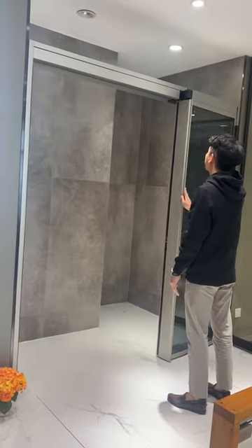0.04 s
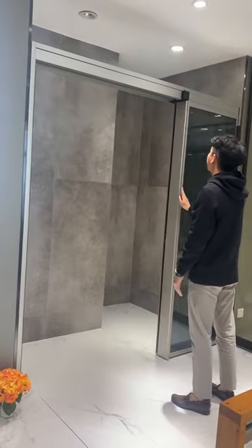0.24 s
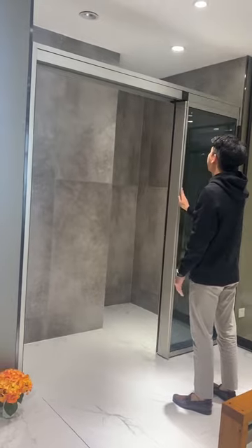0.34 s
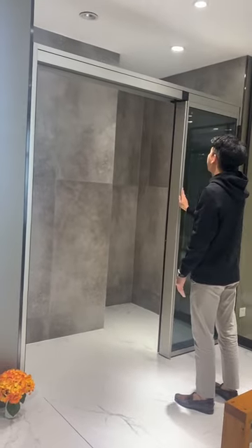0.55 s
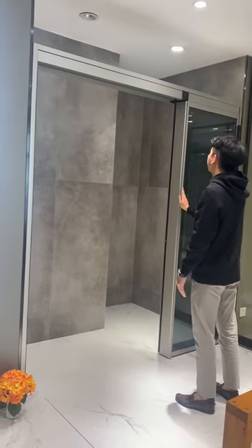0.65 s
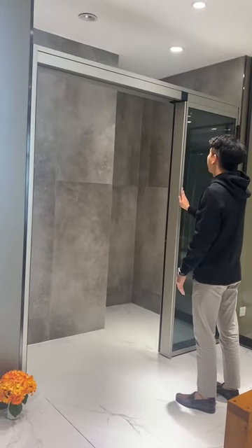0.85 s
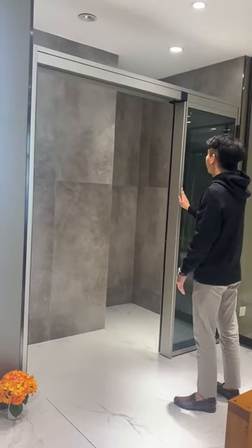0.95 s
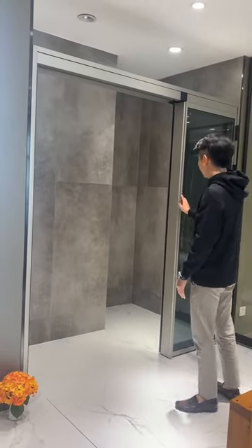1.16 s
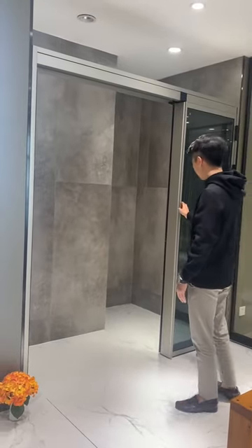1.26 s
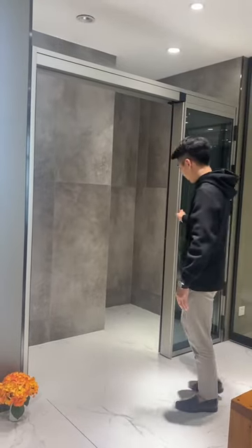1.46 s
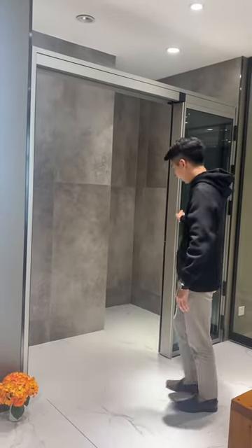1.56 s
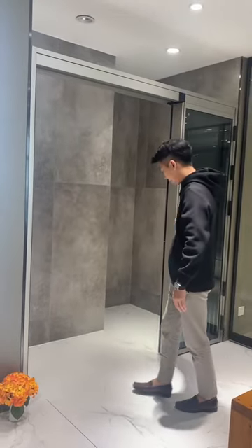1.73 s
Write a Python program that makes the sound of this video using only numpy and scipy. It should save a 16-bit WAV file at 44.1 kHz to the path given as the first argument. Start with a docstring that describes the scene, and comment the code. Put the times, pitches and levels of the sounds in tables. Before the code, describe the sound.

A sliding glass door knocks twice against its metal frame, a catch snaps, and the heavy pane booms and shudders. Shoes and clothes then brush softly over a low ventilation hum, a few metres away in a tiled room.

```python
"""A glass door knocks shut

A glass panel is pushed home and knocks twice on its metal frame, a few metres away in a tiled room.
Each knock is a cluster of contacts that ring the frame and click the fittings. A catch snaps, and
the heavy pane booms and shudders on. Shoes and clothes brush softly as a person turns away,
over a low drone, probably ventilation."""
import sys
import numpy as np
from scipy import signal
from scipy.fft import rfft, irfft
from scipy.io import wavfile
from scipy.ndimage import uniform_filter1d

SR = 44100
rng = np.random.default_rng(int(sys.argv[2]) if len(sys.argv) > 2 else 0)


def bounce(signal):
    """Save signal as a 16-bit WAV file at the path given by the first command-line argument."""
    frames = np.transpose(np.atleast_2d(signal))
    limited = np.clip(frames, -1, 1)
    pcm = np.round(limited * 32767).astype(np.int16)
    wavfile.write(sys.argv[1], SR, pcm)


N = 79380

# The panel meets the frame. Each row: start in seconds, then knock, click, clack and extra bass in dB.
CONTACTS = [(0.22, -1.5, -9, -1, -4.5), (0.226, -4.5, 3, -9, -2.5), (0.241, 2.5, 0, -7, -1.5),
            (0.275, -3, -20.5, -17.5, 2), (0.311, -8.5, -19.5, -10, 0), (0.320, 2.5, -3, -1, 1),
            (0.333, -2, 2, -18, 3), (0.343, -1.5, 0.5, -14.5, 3)]
# How the panel's edge loses treble. Each row: frequency in Hz, gain in dB.
EDGE_SOFTNESS = [(3500, -0.5), (7000, -20.5)]
DOOR_DIRECT_DB = -18.5  # sound straight from the door, compared with its echo


def knocks():
    """Each contact cracks, clicks the fittings and rings the frame; heavier ones bring out more bass."""
    # The tone of a knock and of a click. Each row: frequency in Hz, gain in dB.
    knock_tone = [(100, -5.5), (250, -1), (550, -5), (850, -2.5), (1300, -5), (1750, -12.5), (2650, -17),
                  (3100, -16), (4400, -19), (7000, -32), (13000, -45.5)]
    click_tone = [(1500, -24.5), (3200, -27.5), (4500, 1.5), (4850, -18.5), (5400, -0.5), (7500, -2.5),
                  (9500, -13.5), (12500, -17.5)]
    # The frame's notes. Each row: pitch in Hz, level in dB, seconds to fade by 60 dB.
    frame_notes = [(328, -3, 1), (380.4, -6.5, 0.8), (482.5, -8, 0.91), (648, -6.5, 0.74),
                   (769.3, 4.5, 0.47), (800.6, 1, 0.43), (838, 0.5, 0.38), (891, 0, 0.35),
                   (947, -1.5, 0.18), (983, 2.5, 0.36), (1226, -5.5, 0.58), (1353, -4, 0.19),
                   (2482, -11.5, 0.55)]
    t, body, clicks, rings = clock(), 0, 0, 0
    for start, knock_db, click_db, _, bass_db in CONTACTS:
        bass_gain = [(706, bass_db), (1290, 0)]  # full effect below 706 Hz, none above 1290 Hz
        crack = rng.standard_normal(N) * np.exp(-t / .003)
        crack = undb(-18.5) * crack / np.sqrt(np.sum(crack ** 2))
        hit = delay(room(DOOR_DIRECT_DB) + crack, start)
        body += undb(knock_db) * colour(hit, bass_gain)
        clicks += undb(click_db) * hit
        notes = [(hz, db + lookup(bass_gain, hz), fade_s) for hz, db, fade_s in frame_notes]
        ringing = ring(notes, wander_hz=7.98) * rise(0.0019)
        rings += undb(knock_db) * delay(ringing, start)
    return undb(6) * colour(body, knock_tone) + undb(-6.5) * colour(clicks, click_tone) + undb(-46) * rings


def pane():
    """Soft pushes set the heavy pane swinging, and the room booms with it."""
    # The pane swings against its stops. Each row: start in seconds, level in dB, push time in seconds.
    thumps = [(0.002, -26, 0.00077), (0.23, -13, 0.012), (0.272, -14, 0.0054), (0.349, 1.5, 0.011),
              (0.45, -13, 0.004), (0.525, -13, 0.0024), (0.592, -10, 0.0043), (0.795, -27.5, 0.0074),
              (1.014, -20, 0.016), (1.069, -23, 0.0066)]
    # The pane's notes. Each row: pitch in Hz, level in dB, seconds to fade by 60 dB.
    pane_notes = [(59.3, -12.5, 1), (68.3, -14, 1.0), (100.3, 4.5, 0.16), (139.26, 2.5, 0.37),
                  (163.6, 0, .42), (208.75, -1.5, 0.42), (312, -13, 0.3)]
    # The tone of the boom. Each row: frequency in Hz, gain in dB.
    boom_tone = [(20, -47.5), (40, -14.5), (60, 7), (100, 2.5), (150, 12.5), (220, 2), (320, -1.5),
                 (500, -8), (1000, -51.5)]
    ringing, boom = 0, 0
    for start, db, push_s in thumps:
        swell = undb(db) * rise(push_s)
        ringing += delay(swell * ring(pane_notes, wander_hz=1.6), start)
        boom += delay(swell * room(DOOR_DIRECT_DB), start)
    return undb(-27.5) * ringing + undb(13.5) * colour(boom, boom_tone)


def clacks():
    """The metal edge chatters for a few milliseconds at each contact."""
    # Where the edge rings. Each row: pitch in Hz, width in Hz, level in dB.
    edge_peaks = [(818, 113, 2.5), (958, 120, 2), (1357, 157, 0), (2020, 220, -5.5), (2360, 240, -1.5),
                  (2714, 103, -4.5), (3450, 180, -21)]
    shape = undb(-27) * pulse(rise_s=0.0018, fall_s=0.009)
    out = sum(delay(undb(db) * shape * resonant(edge_peaks), start) for start, _, _, db, _ in CONTACTS)
    out = colour(out, EDGE_SOFTNESS)
    return out + undb(-1) * convolve(out, room(DOOR_DIRECT_DB))


def catch():
    """The metal catch pings as it is forced aside, then snaps home."""
    # Its moves. Each row: start in seconds, level in dB, pitch in Hz, width in Hz, fall in seconds.
    moves = [(0.311, -29.5, 2760, 161, 0.0069), (0.316, -37.5, 3600, 450, 0.0043),
             (0.333, -40, 8500, 3200, 0.011)]
    out = 0
    for start, db, hz, width, fall_s in moves:
        band = [(hz - 1.8 * width, -40), (hz - width / 2, -3), (hz, 0),
                (hz + width / 2, -3), (hz + 3 * width, -40)]
        out += delay(undb(db) * pulse(0.0023, fall_s) * noise(band), start)
    return out + undb(-9) * convolve(out, room(DOOR_DIRECT_DB))


def tap():
    """The loose panel squeaks faintly in its guide and taps it once as it is pushed."""
    # Where the tap rings. Each row: pitch in Hz, width in Hz, level in dB.
    tap_peaks = [(274, 31, 2.5), (1100, 110, -2.5), (1700, 350, -10), (3350, 400, -13), (5600, 1200, -23)]
    burst = pulse(rise_s=0.0051, fall_s=0.021) * colour(resonant(tap_peaks), EDGE_SOFTNESS)
    burst = delay(undb(-53) * burst, seconds=0.126)
    squeak_time = clock() - 0.11  # zero where the squeak is loudest
    squeak_hz = (3690 - 9200 * squeak_time) * (1 + 0.016 * wobble(370))
    squeak = undb(-80) * np.exp(-(squeak_time / .014) ** 2) * sine(squeak_hz)
    return convolve(burst + squeak, room(direct_db=-2.3))


def brushes():
    """The door seal, then shoes and clothes, slide: uneven rubbing noise that swells and dies away."""
    # The strokes. Each row: start, rise and fall in seconds, swish and dull rub in dB,
    # extra slope of the swish in dB per octave.
    strokes = [(0.199, 0.013, 0.0056, -50, -42, -3), (0.833, 0.054, 0.032, -49.5, -55, -5.5),
               (0.96, 0.034, 0.034, -70.5, -59.5, 13), (1.371, 0.065, 0.008, -61, -63, 3),
               (1.599, 0.13, 0.35, -63, -69, 3), (1.733, 0.0045, 0.012, -62, -62.5, 0)]
    # The tone of the swish and of the rub. Each row: frequency in Hz, gain in dB.
    swish_tone = [(1000, -25), (2800, -21.5), (3800, -4), (4800, -6), (6300, 1.5), (8000, -3.5),
                  (10000, -5.5), (12500, -14.5)]
    rub_tone = [(150, -26), (400, 7.5), (900, 4.5), (1500, 3), (2500, 2), (4500, -6.5), (9000, -45)]
    t, out = clock(), 0
    for start, rise_s, fall_s, swish_db, rub_db, slope in strokes:
        swell = np.clip((t - start) / rise_s, 0, 1) ** 0.72
        fade = np.exp(-np.maximum(t - start - rise_s, 0) / fall_s)
        swish = noise([(hz, db + slope * np.log2(hz)) for hz, db in swish_tone])
        flutter = undb(0.69 * wobble(99))
        out += swell * fade * flutter * (undb(swish_db) * swish + undb(rub_db) * noise(rub_tone))
    return undb(-4.5) * convolve(out, room(direct_db=-6))


def scrapes():
    """A turning sole sticks and slips on the tiles in short, grainy strokes."""
    # The slips. Each row: start in seconds, level in dB, fall in seconds.
    slips = [(1.566, -69.5, 0.05), (1.604, -72, .016), (1.622, -71, .018)]
    # Where the sole rings. Each row: pitch in Hz, width in Hz, level in dB.
    sole_peaks = [(890, 500, -5.5), (1860, 700, -4), (2650, 480, -0.5), (3390, 300, -2), (4100, 400, -2),
                  (5320, 350, -3)]
    out = 0
    for start, db, fall_s in slips:
        grain = undb(3 * wobble(400))
        out += delay(undb(db) * pulse(.006, fall_s) * grain * resonant(sole_peaks), start)
    return convolve(out, room(direct_db=-2))


def ventilation():
    """A fan's wavering hum, with a narrow drone around it, in a low rush of air."""
    # The tone of the moving air. Each row: frequency in Hz, gain in dB.
    air_tone = [(20, -21.5), (40, -4), (62, -1), (100, 0), (140, -5.5), (220, -10), (380, -15.5),
                (600, -27), (1200, -32), (2500, -44.5), (6000, -51.5), (13000, -62.5)]
    hum_hz, drone_hz, drone_width_hz = 87.5, 89, 17
    drone = shaped_noise(1 / (1 + ((frequencies() - drone_hz) / (drone_width_hz / 2)) ** 2))
    hum = sine(hum_hz * (1 + .03 * wobble(7.98))) * undb(3.5 * wobble(13))
    return undb(-59) * unit(hum) + undb(-55) * drone + undb(-57.5) * noise(air_tone)


def room(direct_db):
    """How the tiled room answers a click: direct sound, strong early echoes, a long tail that dulls."""
    # How long the echo lasts. Each row: frequency in Hz, seconds to fade by 60 dB.
    fade_times = [(60, 0.78), (200, 1.25), (500, 1.285), (1200, 1.176), (2500, 1.02), (5000, 0.85),
                  (8000, 0.59), (12000, 0.37)]
    t, tail = clock(), 0
    spectrum = rfft(rng.standard_normal(N))
    centres = 40 * 2 ** np.arange(0, 9.5, .5)  # bands half an octave apart, in Hz
    for hz, pick in zip(centres, np.eye(len(centres))):
        band = lookup(np.column_stack([centres, pick]), frequencies())
        tail += irfft(spectrum * band, N) * undb(-60 * t / lookup(fade_times, hz))
    tail *= 1 + undb(0.5) * np.exp(-t / 0.063)  # early echoes
    tail /= np.sqrt(np.sum(tail ** 2))
    tail[0] += undb(direct_db)
    return tail


def ring(notes, wander_hz):
    """The fading notes of a struck part; it sits loosely, so each one wanders in pitch."""
    t = clock()
    return sum(undb(db - 60 * t / fade_s) * sine(hz + wander_hz * wobble(40.2))
               for hz, db, fade_s in notes)


def resonant(peaks):
    """Noise that is strongest around the given pitches."""
    f = frequencies()[1:]
    power = sum(undb(db) ** 2 / (1 + ((f / hz - hz / f) * hz / width) ** 2) for hz, width, db in peaks)
    return shaped_noise(np.sqrt(np.append(0, power)))


def noise(tone):
    """Steady noise that follows a tone table."""
    return shaped_noise(undb(lookup(tone, frequencies())))


def shaped_noise(gains):
    """Noise with one gain for each frequency, scaled to strength 1."""
    return unit(irfft(rfft(rng.standard_normal(N)) * gains, N))


def colour(x, tone):
    """Filter a sound by a tone table, so that nothing rings before the sound starts."""
    cepstrum = irfft(np.log(undb(lookup(tone, frequencies()))), N)
    cepstrum[1:N // 2] *= 2
    cepstrum[N // 2 + 1:] = 0
    return convolve(x, irfft(np.exp(rfft(cepstrum)), N))


def wobble(rate):
    """A smooth random curve of strength 1 that changes about `rate` times a second."""
    hold = int(SR / rate)
    steps = np.repeat(rng.standard_normal(N // hold + 1), hold)
    return unit(uniform_filter1d(uniform_filter1d(steps, hold), hold)[:N])


def lookup(points, hz):
    """Read between a table's rows, with octaves evenly spaced."""
    f, values = np.array(points).T
    return np.interp(np.log(np.maximum(hz, 1)), np.log(f), values)


def rise(seconds):
    return 1 - np.exp(-clock() / seconds)


def pulse(rise_s, fall_s):
    return rise(rise_s) * np.exp(-clock() / fall_s)


def sine(hz):
    return np.sin(2 * np.pi * np.cumsum(hz) / SR)


def delay(x, seconds):
    return np.concatenate([np.zeros(int(seconds * SR)), x])[:N]


def convolve(a, b):
    return signal.fftconvolve(a, b)[:N]


def undb(db):
    return 10 ** (np.asarray(db) / 20)


def unit(x):
    return x / np.sqrt(np.mean(x ** 2))


def clock():
    return np.arange(N) / SR


def frequencies():
    return np.fft.rfftfreq(N, 1 / SR)


def scene():
    """The door, the person and the ventilation together in one channel."""
    return (tap() + knocks() + clacks() + catch() + pane() + brushes() + scrapes() + ventilation())[None]


def record(dry):
    """Cut the treble above 12500 Hz."""
    return signal.sosfilt(signal.ellip(8, .2, 70, 12500, fs=SR, output="sos"), dry)


dry = scene()
out = record(dry)
bounce(out)
```